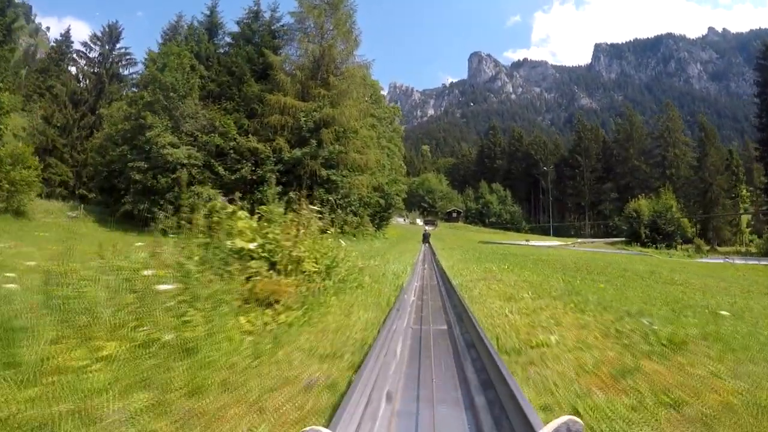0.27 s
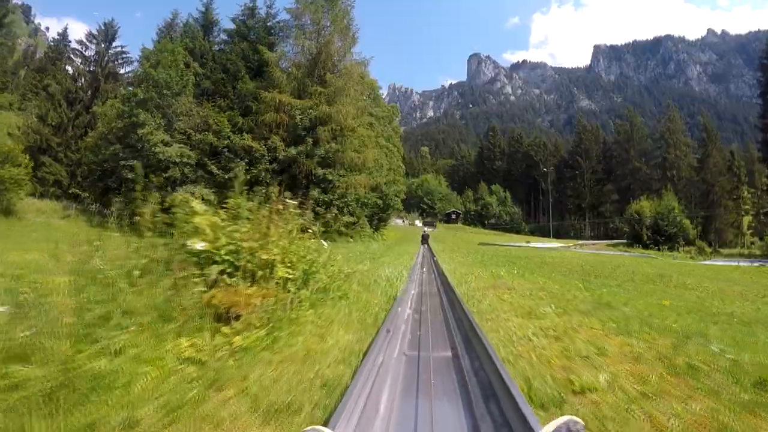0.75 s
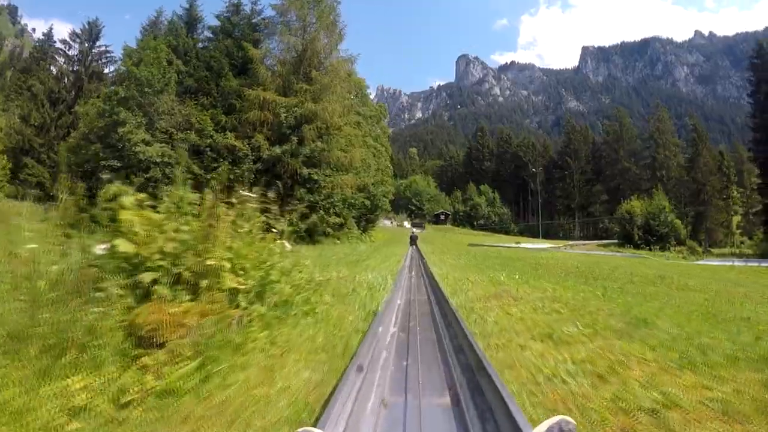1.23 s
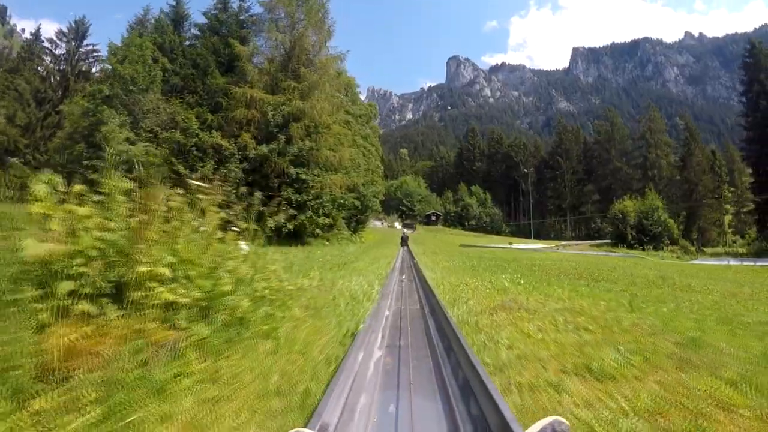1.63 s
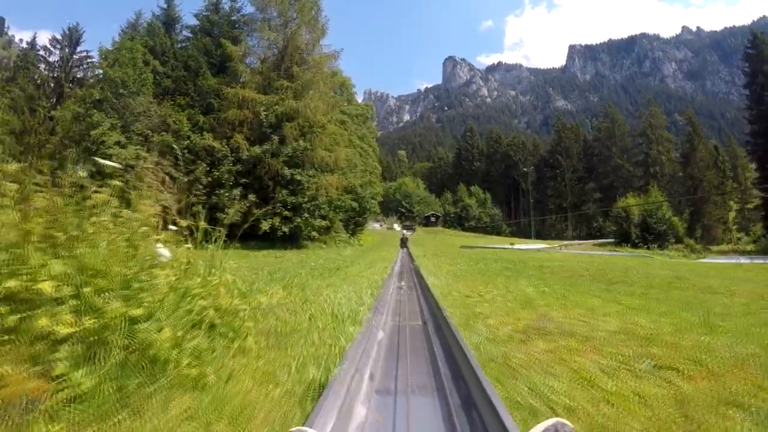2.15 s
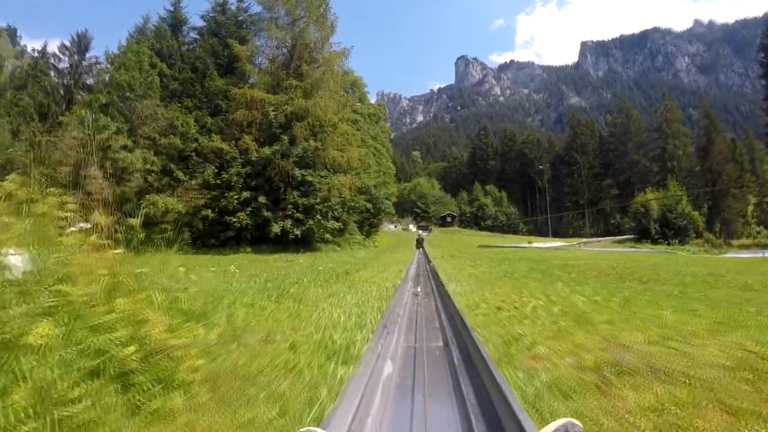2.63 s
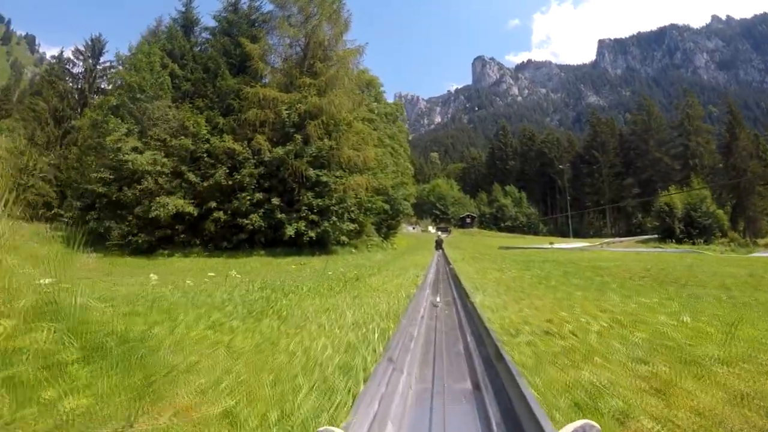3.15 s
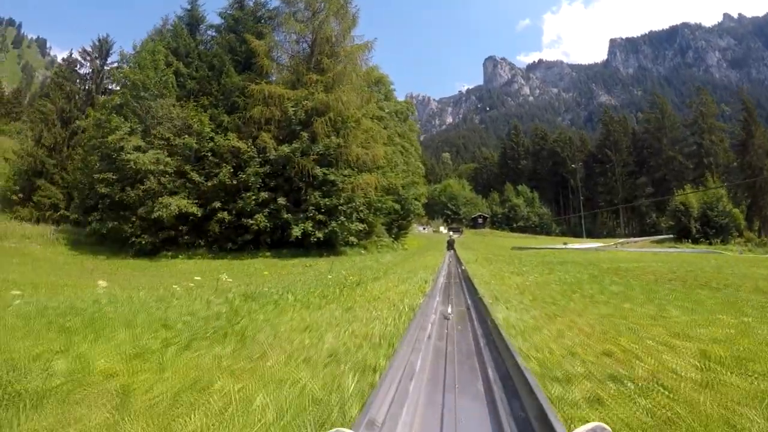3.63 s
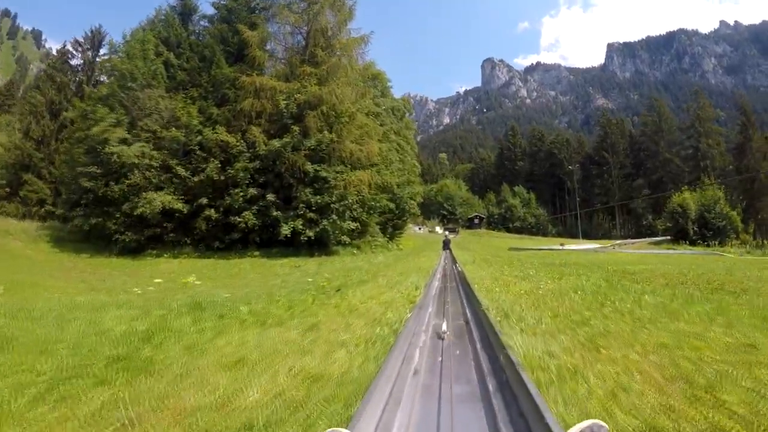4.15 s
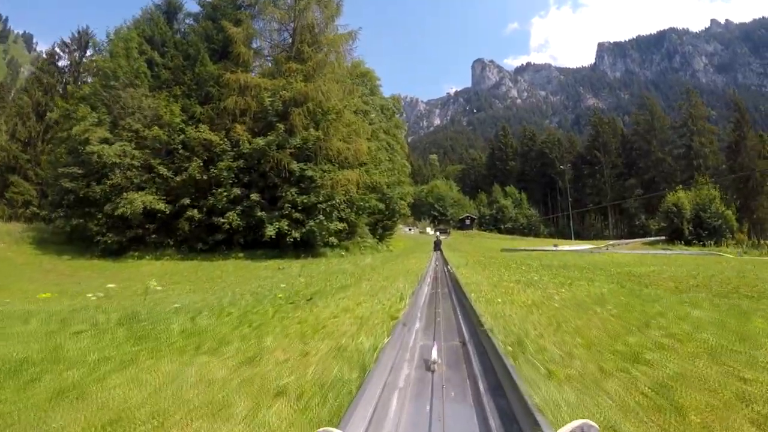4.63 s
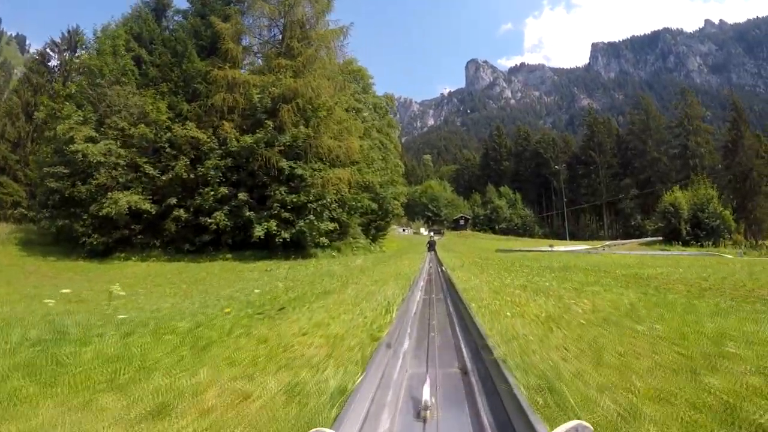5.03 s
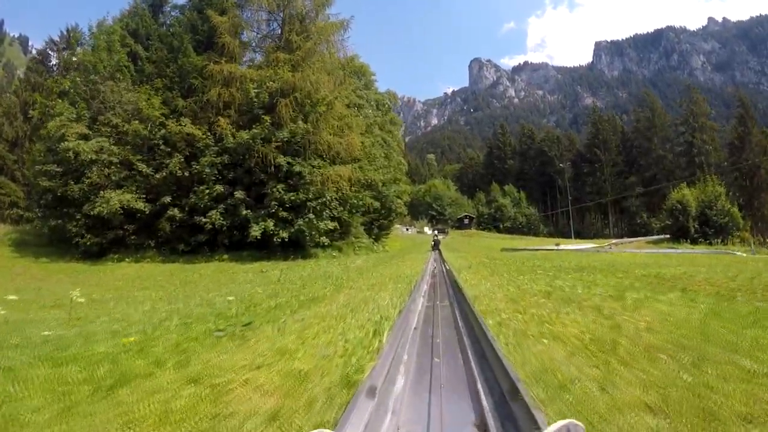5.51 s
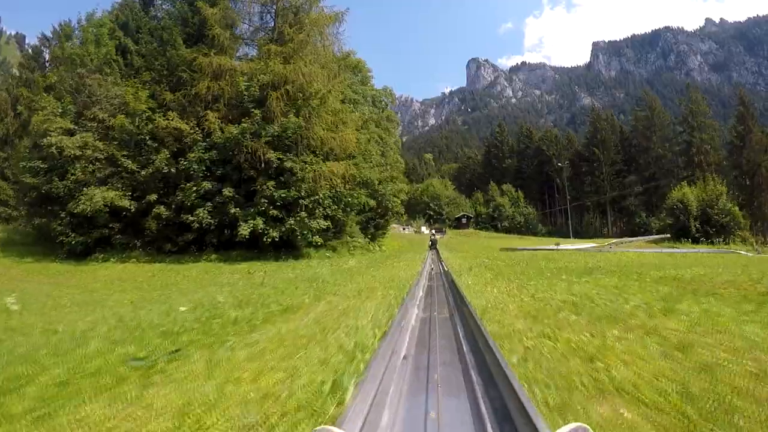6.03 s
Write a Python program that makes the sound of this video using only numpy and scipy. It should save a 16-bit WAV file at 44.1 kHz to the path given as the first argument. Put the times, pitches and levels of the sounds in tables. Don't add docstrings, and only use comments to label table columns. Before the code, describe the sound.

A continuous low rumble of wheels on gritty steel, with uneven drumming, midrange hum and thin hiss, close and outdoors. Joints clack, loose parts rattle and tick, and the sled body knocks hollowly. A high pulsing insect buzz comes and goes early; tiny grass seed flicks tick later. The mounted microphone starts mono and bassy, then spreads wide after the middle; one strong clank comes shortly before the ride cuts off still rolling.

```python
import sys
import numpy as np
from scipy import signal
from scipy.fft import rfft, irfft
from scipy.io import wavfile
from scipy.ndimage import uniform_filter1d

SR = 44100
rng = np.random.default_rng(int(sys.argv[2]) if len(sys.argv) > 2 else 0)


def ratio_of_db(decibels):
    return 10 ** (np.asarray(decibels, float) / 20)


def store_wav(level_fs):
    pcm = np.round(np.clip(np.atleast_2d(level_fs), -1, 1) * 32767)
    wavfile.write(sys.argv[1], SR, pcm.T.astype(np.int16))


N = 276507
T = np.arange(N) / SR

WIDE_FADE_S, WIDE_FADE_DB = (3.43, 3.534, 3.9), (-65, -12.5, 0)
# time in seconds, thud level in dB, length in ms.
THUDS = [(0.004, -20.5, 9), (0.147, -28.5, 6), (0.345, -28, 2.9), (0.675, -28, 2.2), (1.049, -21.5, 3.4),
         (1.968, -28.5, 8.3), (1.992, -27.5, 9.3), (2.101, -27.5, 2.8), (2.185, -26.5, 3.2),
         (2.208, -26.5, 4.5), (2.612, -24, 5.7), (2.667, -26.5, 6.4), (3.144, -30, 3.7), (3.172, -24, 3.3),
         (3.29, -27, 2.9), (4.515, -46, 3.2), (4.685, -30, 14), (4.709, -35, 4.1), (4.8, -32, 3.7),
         (4.916, -29.5, 3.7), (5.131, -30, 3.5), (5.148, -33, 8.3), (5.386, -40, 6.4), (5.62, -25, 3.1),
         (5.725, -30, 5.9), (5.931, -43, 1.4), (5.969, -46, 9.1), (5.997, -31, 1.9), (6.03, -33.5, 3.9),
         (6.208, -26.5, 5.4)]


def evened(x):
    return x / np.sqrt(np.mean(x ** 2) + 1e-20)


def read(points, hz):
    f, value = np.transpose(points)
    return np.interp(np.log(hz + 1), np.log(f + 1), value)


def split(hz, edges_hz):
    below = [1 / (1 + (hz / edge) ** 6) for edge in edges_hz]
    return np.diff([0 * hz, *below, 1 + 0 * hz], axis=0)


def wander(top_hz):
    lowpass = signal.butter(2, top_hz, fs=SR, output="sos")
    return evened(signal.sosfiltfilt(lowpass, rng.standard_normal(N)))


def wide_fade_db():
    return np.interp(T, WIDE_FADE_S, WIDE_FADE_DB)


def layers(noise_spectrum, colour, steady=0.7):
    # frequency in Hz, width in Hz, lift in dB.
    trough_modes = [(62.7, 13, -2), (201.2, 34, -5), (330.4, 64, 4), (2024, 370, -3), (3770, 320, -8.5),
                    (6600, 520, -17.5)]
    hz = np.fft.rfftfreq(N, 1 / SR)
    lift = 1 + sum(ratio_of_db(db) / (1 + (2 * (hz - f) / width_hz) ** 2) for f, width_hz, db in trough_modes)
    weights = split(hz, (100, 260, 1000))
    bands = irfft(noise_spectrum * ratio_of_db(read(colour, hz)) * lift * weights, N)
    swell = uniform_filter1d(uniform_filter1d(bands ** 2, 2600, axis=1), 2600, axis=1)
    return np.array([evened(b) for b in bands / (abs(swell) + 1e-12) ** (steady / 2)])


def bumps(rows, width_s):
    s, lift_db = np.transpose(rows)
    coarse_s = T[::64]
    lift = lift_db @ np.exp(-((coarse_s - s[:, None]) / width_s) ** 2)
    return np.interp(T, coarse_s, lift)


def levels(offset_db, follow, bumpy):
    # time in seconds, wheel load in dB, grit on the steel in dB.
    ride = [(0.03, -20, -37), (0.3, -25, -38.5), (0.62, -18, -32.5), (0.9, -23, -38.5), (1.1, -24.5, -38),
            (1.4, -20.5, -35), (1.77, -24.5, -38.5), (2.25, -19, -35.5), (2.6, -19, -37.5),
            (3.0, -21, -35.5), (3.43, -18.5, -37), (3.64, -22.5, -38), (3.82, -23, -34.5),
            (4.5, -23, -39.5), (4.76, -21, -37.5), (5.3, -23, -39), (5.78, -22.5, -40), (6.2, -21, -39.5)]
    # time in seconds, lift in dB.
    bounces = [(0.03, -1), (0.13, 10.5), (0.25, -1), (0.45, 1.5), (1.01, 5), (1.24, 6), (1.43, -12.5),
               (1.61, 4), (2.01, 6.5), (2.2, 0), (2.41, 4), (2.69, -8.5), (3.15, 2.5), (3.38, 2), (3.62, 5),
               (3.8, -6.5), (4.09, 3), (4.17, -7.5), (4.31, -5.5), (4.4, 3), (4.91, 4), (5.25, 4.5),
               (5.51, 7.5), (5.66, 4), (5.8, 7), (6.03, -0.5), (6.2, 5)]
    # time in seconds, lift in dB.
    drums = [(0.06, 3.5), (0.19, -6), (0.31, 5.5), (0.39, -5), (0.45, 4.5), (0.66, 0.5), (0.79, -9.5),
             (1.01, -3), (1.11, 8.5), (1.33, -1), (1.43, 3), (1.9, 4.5), (2.01, 11.5), (2.2, 4), (2.41, -7),
             (2.66, 6), (3.15, -3.5), (3.38, 2.5), (3.97, -5), (4.17, 4), (5.22, -4.5), (5.37, 3.5),
             (5.51, -6), (5.89, -16), (5.96, 2.5), (6.11, 2)]
    mean_load_db, mean_grit_db = -21, -38
    s, load_db, grit_db = np.transpose(ride)
    load = np.interp(T, s, load_db - mean_load_db)
    grit = np.interp(T, s, grit_db - mean_grit_db)
    boom = bumpy * bumps(bounces, width_s=0.065)
    drumming = bumpy * bumps(drums, width_s=0.038)
    base_db = np.reshape([mean_load_db, mean_load_db, mean_grit_db, mean_grit_db], (-1, 1)) + offset_db
    course_db = np.reshape(follow, (-1, 1)) * [load, load, grit, grit]
    return base_db + course_db + [boom, drumming, 0 * T, 0 * T]


def patchy(x, depth_db):
    z = signal.stft(x, nperseg=256)[2]
    patches = uniform_filter1d(rng.standard_normal(z.shape), 7, axis=0)
    patches = evened(uniform_filter1d(patches, 9, axis=1))
    return evened(signal.istft(z * ratio_of_db(depth_db * patches), nperseg=256)[1][:N])


def played(bands, levels_db, grit):
    flicker_db = np.outer([0, 1.1, 1.23, 1.4], grit)
    hiss = patchy(bands[-1], depth_db=1.7)
    return ([*bands[:-1], hiss] * ratio_of_db(levels_db + flicker_db)).sum(0)


def rolling():
    # frequency in Hz, density in dB per Hz.
    wind_colour = [(12, -33), (20, 10), (53, 5.5), (106, -8), (196, 3), (282, -15), (566, -16.5),
                   (632, -24), (747, -24), (987, -37), (1380, -41), (2480, -51.5), (3760, -52.5),
                   (10700, -65), (11300, -69.5), (15600, -75)]
    stereo_colour = [(12, -48), (20, 16), (50, 7.5), (112, -3), (191, 2), (274, -23), (465, -29.5),
                     (669, -26.5), (1100, -49), (1820, -46.5), (2280, -54.5), (9170, -62.5), (12500, -74.5),
                     (13500, -81), (15600, -93.5)]
    wide_colour = [(12, -13), (20, 21.5), (61, -12), (112, -9.5), (186, -11), (290, -28.5), (492, -15.5),
                   (582, -7.5), (747, -28), (883, -32), (1040, -51.5), (1870, -61), (2410, -71.5),
                   (9420, -72), (15600, -113)]
    # frequency in Hz, share 0-1.
    lean_share = [(40, 0.6), (90, 0), (200, 0.61), (600, .05), (2000, 0.4), (8000, 0.2)]
    wind_db, stereo_db = (2.5, -1, -1, -11.5), (-3.5, -4.5, -3, -17.5)
    wide_offset_db = (9.5, 8, 2.5, -6)
    follow, wide_follow = (0.81, 1.03, 1.54, 1.28), (0.6, 0.83, 0.6, 0.6)

    first, second, third = rfft(rng.standard_normal((3, N)))
    lean = np.clip(read(lean_share, np.fft.rfftfreq(N, 1 / SR)), 0, 0.99)
    turn = np.interp(T, (3.54, 4.69), [0, np.pi / 2])
    grit = evened(wander(23.5) + 1.1 * wander(92))
    centre = np.cos(turn) * layers(first, wind_colour) + np.sin(turn) * layers(second, stereo_colour)
    wide = layers(np.sqrt(1 - lean ** 2) * third - lean * second, wide_colour, steady=0.18)
    mode_db = np.outer(wind_db, np.cos(turn) ** 2) + np.outer(stereo_db, np.sin(turn) ** 2)
    wide_db = np.reshape(wide_offset_db, (-1, 1)) + wide_fade_db()
    centre = played(centre, levels(mode_db, follow, bumpy=1), grit)
    wide = played(wide, levels(wide_db, wide_follow, bumpy=0.31), grit)
    return np.array([centre, wide * (T > WIDE_FADE_S[0])])


def hits():
    # time in seconds, clack level in dB, thud over clack in dB, rattle length in ms.
    clacks = [(0.04, -28.5, 13.5, 6.5), (0.325, -45, -4, 3.8), (0.411, -33.5, -3, 6.5),
              (0.441, -26.5, 10, 4.25), (0.466, -35.5, 6, 4.8), (0.545, -36, 6, 8),
              (0.597, -24.5, 8.5, 4.9), (0.62, -36, -4, 4.8), (0.656, -25.5, 7, 6), (1.015, -39.5, 1, 2.3),
              (1.149, -29.5, 6, 2.1), (1.245, -33, 12, 4), (1.295, -32, 13.5, 4.6), (1.357, -31, 11.5, 5),
              (1.427, -24, 12.5, 5.5), (1.447, -32.5, 1, 5), (1.475, -37, 8, 5.3), (1.552, -30.5, 9.5, 5.7),
              (1.638, -33.5, -24, 2.8), (1.715, -35, -1, 3.9), (1.758, -33, 11.5, 4.9),
              (1.89, -46.5, 21, 8.3), (2.178, -32.5, -5, 4.8), (2.525, -26.5, 2, 1.3), (2.631, -36, 6, 5.1),
              (2.821, -38, 3, 2.7), (2.835, -33, 8.5, 4.4), (2.916, -40, -2, 4.1), (3.064, -30, -1, 1.96),
              (3.113, -44, -5, 3.9), (3.244, -38.5, -11, 2.4), (3.354, -41, 11, 11),
              (3.385, -35, 10.5, 4.9), (3.48, -38, 11, 6.5), (3.565, -40, 14, 3.9)]
    late_clacks = [(3.713, -44, -11, 2), (3.738, -37, 1, 1.6), (3.752, -35.5, 6, 2), (3.78, -41.5, 4, 3),
                   (3.889, -36.5, 10.5, 3.5), (3.947, -46.5, 15.5, 6.6), (4.03, -36, 10, 2.3),
                   (4.086, -35.5, 6.5, 4.1), (4.099, -29.5, 4.5, 2.9), (4.12, -40.5, 8, 1.3),
                   (4.161, -43, 12.5, 2.1), (4.21, -34, 8, 2.2), (4.247, -34, 9.5, 1.9),
                   (4.295, -43.5, 15, 3.2), (4.413, -50.5, 12, 6.3), (4.438, -33.5, 2, 1.4),
                   (4.496, -46.5, 14, 5.3), (4.581, -48.5, 13, 4), (4.662, -34, 1, 1.87),
                   (4.737, -36.5, 3, 2.3), (5.176, -45.5, 3, 5.4), (5.498, -37.5, 8.5, 4.1),
                   (5.523, -55, 12, 1.9), (5.564, -32, 9, 1.62), (5.695, -48.5, 13, 5.4),
                   (5.787, -30.5, 12.5, 2.6), (5.798, -37.5, -12, 2.3), (5.806, -32, 3, 3.2),
                   (5.817, -37.5, 5, 4.7), (6.147, -45, 11, 1.3), (6.168, -43.5, 10.5, 2.5)]
    # time in seconds, tick level in dB, length in ms.
    ticks = [(0.055, -36.5, 7.4), (0.469, -41.5, 2.6), (0.554, -47.5, 3.5), (0.61, -39, 3.8),
             (0.678, -40.5, 3.4), (1.114, -52.5, 16), (1.418, -46, 6.5), (1.448, -33.5, 3.4),
             (2.186, -41, 2.7), (2.397, -49, 3), (2.548, -49, 5.8), (2.513, -40, 4.7), (2.587, -43, 4.5),
             (2.705, -47, 4), (2.763, -52, 2.3), (2.791, -60, 1.3), (2.87, -50, 12), (2.994, -49, 2.7),
             (3.463, -46, 4), (3.81, -49.5, 6.3), (3.98, -45.5, 2.4), (4.314, -48, 3.8),
             (4.331, -57.5, 3.4), (4.405, -55.5, 2.9), (4.458, -56.5, 1.7), (4.516, -53, 1.8),
             (4.597, -57, 4), (4.705, -50.5, 3), (5.025, -87, 5.5), (5.422, -49.5, 1.7), (5.799, -36, 3.6),
             (5.823, -56, 3.8), (5.88, -62, 3.6), (5.999, -63, 4.2), (6.112, -59, 5.5)]
    rows = [(s, db + thud, db, db - 10, ms) for s, db, thud, ms in clacks]
    rows += [(s, db + thud, db, db - 13, ms) for s, db, thud, ms in late_clacks]
    rows += [(s, db, db - 18, db - 27, ms) for s, db, ms in THUDS]
    rows += [(s, db + 8, db + 3, db, ms) for s, db, ms in ticks]
    return np.transpose(rows)


def blows(length_ms, stretch, lumpy_db, strike_db):
    t = np.arange(4096) / SR
    draw = rng.standard_normal((len(length_ms), 2, len(t)))
    decay_s = stretch * np.maximum(length_ms[:, None] - 1.2, 0.25) / 1000
    u = t / decay_s
    lumps = ratio_of_db(lumpy_db * evened(uniform_filter1d(draw[:, 1], 60, axis=1)))
    swell = (1 - np.exp(-(u / 0.5) ** 1.17)) * np.exp(-u)
    tail = ratio_of_db(-17.5) * u ** 2 * np.exp(-u / 1.18)
    rattle = draw[:, 0] * lumps * (swell + tail)
    strike = (np.arange(len(t)) == 20) * np.linalg.norm(rattle, axis=1)[:, None]
    return rattle + ratio_of_db(strike_db) * strike


def ring(force, times, modes, levels_db):
    hz = np.fft.rfftfreq(force.shape[1], 1 / SR)
    detune = 1 + 0.025 * rng.standard_normal((len(force), len(modes)))
    share = ratio_of_db(2.5 * rng.standard_normal((len(force), len(modes))))
    body = 0
    for i, (mode_hz, width_hz, db) in enumerate(modes):
        f = mode_hz * detune[:, i, None]
        response = width_hz / (width_hz + 1j * (hz ** 2 - f ** 2) / (hz + 30))
        body = body + share[:, i, None] * ratio_of_db(db) * response
    top_hz = np.clip(6996.5 + 150 * (levels_db[1] + 44.5), 5000, 12000)[:, None]
    bands = split(hz, (230, 900, 3000))[1:, None]
    parts = irfft(rfft(force) * body / (1 + (hz / top_hz) ** 4) * bands)
    parts = np.roll(parts, 256, axis=2) * signal.windows.tukey(parts.shape[2], 0.1)
    peak = np.sqrt(uniform_filter1d(parts ** 2, 88, axis=2).max(2))
    sounds = (parts * (ratio_of_db(levels_db) / peak)[:, :, None]).sum(0)
    out = np.zeros(N + 2 * force.shape[1])
    for s, sound in zip(times, sounds):
        out[round(s * SR):][:len(sound)] += sound
    return out[256 + 44:][:N]


def knocks():
    # frequency in Hz, width in Hz, level in dB.
    sled_modes = [(342, 250, 16.5), (750, 112, 8), (1524, 840, 8.5), (1980, 91, 12), (2710, 29, 6),
                  (3630, 1150, 8), (4720, 260, 8), (6000, 600, -49.5), (8300, 800, -31)]
    late_modes = [(413, 550, 4.5), (656, 66, 4), (1413, 155, 12.5), (1800, 490, 6.5), (2700, 240, 1.5),
                  (3900, 1640, 7), (4780, 500, -1), (5700, 490, 8), (8300, 1200, -30)]
    wide_modes = [(422, 200, 14.5), (549, 33, -6), (840, 54, 1), (1280, 290, -13), (2000, 300, -30),
                  (2900, 500, -46), (6000, 1500, -31), (9000, 1500, -46)]
    hollow_modes = [(675, 35, 6), (433, 170, -25), (1470, 100, -2.5), (1790, 180, -3), (4000, 2900, -18)]
    hollow_db = (-2, -0.5, -3)

    every = hits()
    late = every[0] > 3.6
    s, thud, clack, tick, length_ms = every[:, ~late]
    centre = ring(blows(length_ms, 1.75, 1.4, -14), s, sled_modes, [thud, clack, tick])

    s, thud, clack, tick, length_ms = every[:, late]
    force = blows(length_ms, 1.94, 2.8, -9.5)
    hollow = np.isin(s, np.transpose(THUDS)[0])
    big = (s > 5.77) & (s < 5.81)
    parts_db = np.array([thud, clack, tick]) + np.outer(hollow_db, hollow)
    for modes, some in [(late_modes, ~hollow & ~big), (sled_modes, big)]:
        centre += ring(force[some], s[some], modes, parts_db[:, some])
    hollow_force = blows(0.62 * length_ms[hollow], 1.8, 1.5, -23)
    centre += ring(hollow_force, s[hollow], hollow_modes, parts_db[:, hollow])
    wide = ring(force, s, wide_modes, [thud + 16 - 2.9 * hollow, clack + 1.1, tick - 2.5])
    return np.array([centre, -wide * ratio_of_db(wide_fade_db())])


def damped_tones(rows, lift_db, rise_ms, wide_db):
    t, out = np.arange(4096) / SR, np.zeros(N + 4096)
    rise = 1 - np.exp(-(1000 * t / rise_ms) ** 2)
    for s, peak_db, hz, t60_ms in rows:
        decay_db = 60 * 1000 * t / max(t60_ms, 8)
        tone = rise * ratio_of_db(peak_db + lift_db - decay_db) * np.sin(2 * np.pi * hz * t)
        out[round(s * SR) - 44:][:len(t)] += tone
    centre = out[:N]
    return np.array([centre, -centre * ratio_of_db(wide_db) * (T > WIDE_FADE_S[-1])])


def body_notes():
    # time in seconds, peak in dB, pitch in Hz, ring t60 in ms.
    note_rows = [(0.039, -17, 374, 60), (0.144, -13.5, 468, 64), (0.439, -17, 388, 52),
                 (0.596, -19, 395, 51), (0.656, -14, 375, 68), (1.052, -22, 377, 60),
                 (1.147, -13.5, 420, 56), (1.245, -22, 770, 60), (1.294, -19, 390, 69),
                 (1.356, -14, 382, 65), (1.426, -11, 380, 48), (1.552, -24, 382, 60), (1.758, -16, 532, 48),
                 (2.184, -18, 391, 74), (2.614, -26, 396, 79), (2.833, -18, 708, 47), (3.885, -21, 423, 80),
                 (4.1, -19, 700, 60), (4.295, -26, 686, 72), (4.687, -30, 681, 60), (4.708, -31, 657, 79),
                 (4.915, -26, 685, 41), (5.13, -30, 716, 67), (5.624, -18, 680, 85), (5.693, -29, 700, 60),
                 (5.724, -33, 692, 52), (5.787, -13.5, 460, 70), (5.933, -32, 673, 67),
                 (5.968, -27, 703, 67), (5.999, -29, 678, 60), (6.033, -29, 668, 60), (6.21, -33, 690, 60)]
    return damped_tones(note_rows, lift_db=-3, rise_ms=2.3, wide_db=-4)


def steel_pings():
    # time in seconds, peak in dB, pitch in Hz, ring t60 in ms.
    ping_rows = [(0.0404, -21, 2000, 91), (0.4155, -33, 1330, 50), (0.4409, -10.5, 2090, 36),
                 (0.599, -25, 2000, 40), (0.6589, -14, 2050, 49), (1.052, -31, 2030, 46),
                 (1.1478, -20, 2230, 25), (1.2461, -23, 1850, 63), (1.296, -20, 2130, 35),
                 (1.3583, -19, 2050, 46), (1.4277, -15, 2145, 40), (1.5539, -20, 2120, 45),
                 (1.6392, -18, 2220, 30), (1.714, -25, 1540, 40), (1.7592, -18, 1300, 27),
                 (2.1867, -26, 1340, 32), (2.5227, -17, 2140, 21), (2.837, -20, 1410, 32),
                 (3.062, -29, 1190, 53), (3.3553, -24, 1470, 40), (3.8838, -24, 1290, 40),
                 (4.03, -28, 1360, 33), (4.0881, -42, 1280, 34), (4.1, -27, 1460, 34),
                 (4.1184, -30, 1450, 45), (4.1599, -34, 1490, 40), (4.2083, -22, 1320, 40),
                 (4.2466, -18, 1410, 20), (4.4383, -30.5, 1470, 33), (4.4957, -36, 1460, 40),
                 (4.6618, -29, 1490, 40), (4.732, -21, 1370, 37), (4.7374, -29, 1490, 30),
                 (4.918, -27.5, 1820, 31), (5.1315, -29, 1455, 43), (5.4212, -30, 1890, 28),
                 (5.4969, -64, 1310, 40), (5.5654, -21, 1450, 24), (5.7872, -9.5, 1870, 28),
                 (5.8, -21, 1290, 40), (6.1459, -36, 1800, 58), (6.167, -23, 1460, 25),
                 (6.2198, -31, 1510, 34)]
    return damped_tones(ping_rows, lift_db=-6, rise_ms=0.67, wide_db=-8)


def resonate(x, hz, width_hz):
    turn = np.exp(2j * np.pi * np.cumsum(hz) / SR)
    r = np.exp(-np.pi * width_hz / SR)
    return 2 * (turn * signal.lfilter([1 - r], [1, -r], x / turn)).real


def resonate_twice(x, hz, second_hz, width_hz):
    return resonate(resonate(x, hz, width_hz), second_hz, width_hz)


def grasshopper():
    # time in seconds, leg strokes so far.
    stroke_rows = [(.213, -3), (.266, 0), (.589, 18), (.714, 25), (.9, 35), (1.051, 43), (1.213, 51),
                   (1.223, 51.5)]
    # time in seconds, level in dB, wing resonance in Hz.
    buzz_rows = [(.2, -72, 7900), (.3, -63, 7950), (.55, -55, 8050), (.8, -53, 8100), (1.0, -53, 8130),
                 (1.15, -50, 8250), (1.22, -50, 8350)]
    strokes = np.interp(T, *np.transpose(stroke_rows))
    s, level_db, hz = np.transpose(buzz_rows)
    swing = 0.5 + 0.5 * np.cos(2 * np.pi * strokes)
    pegs = np.cumsum(720 * (1 + 0.091 * wander(40))) / SR
    clicks = evened(np.diff(np.floor(pegs), prepend=0) * ratio_of_db(2.5 * rng.standard_normal(N)))
    drive = (clicks + 0.45 * rng.standard_normal(N)) * ratio_of_db(1.9 * wander(30))
    wing_hz, high_hz = np.interp(T, s, hz), 12400 + 0 * T
    passing = ratio_of_db(np.interp(T, [0.6, 1.05], [-9, -3]))
    sound = resonate_twice(drive * (swing ** 2.3 + 0.34), wing_hz, wing_hz, 600)
    sound -= passing * resonate_twice(drive * swing ** 3, wing_hz * 1.225, wing_hz * 1.215, 1200)
    sound += passing * resonate_twice(drive * swing ** 3, wing_hz, wing_hz, 1800)
    sound += ratio_of_db(-19) * resonate_twice(drive * swing ** 4, high_hz, high_hz, 2500)
    sound = sound / np.std(sound[SR // 2:SR])
    on = (T > stroke_rows[0][0]) & (T < stroke_rows[-1][0])
    return sound * on * ratio_of_db(np.interp(T, s, level_db))


def metal_chinks():
    # time in seconds, peak in dB, pitch in Hz, ring t60 in ms.
    chink_rows = [(1.1473, -23, 3720, 21), (1.3587, -22, 3360, 25), (1.4272, -25, 4890, 25),
                  (1.6387, -30, 4150, 27), (1.7146, -22.5, 3780, 23), (2.1859, -18.5, 3770, 21),
                  (2.524, -26, 4490, 28), (3.0634, -20, 3520, 23), (4.0284, -46, 3080, 25),
                  (4.245, -35, 3000, 25), (4.4378, -41, 3050, 25), (5.564, -28, 3200, 20),
                  (5.7867, -34, 3740, 25), (5.799, -19, 3130, 22), (6.1115, -38, 6360, 33),
                  (6.1454, -41, 3830, 25)]
    return damped_tones(chink_rows, lift_db=-7, rise_ms=0.73, wide_db=-12)


def seed_flicks():
    # time in seconds, peak in dB, pitch in Hz, ring t60 in ms.
    flick_rows = [
        (2.748, -42, 11500, 8),
        (2.788, -32, 10200, 8.7),
        (3.815, -50, 13500, 14),
        (3.984, -46, 10000, 8),
        (4.06, -48, 12500, 8),
        (6.118, -48, 12000, 10),
    ]
    return damped_tones(flick_rows, lift_db=-7, rise_ms=0.73, wide_db=-12)


def scene():
    centre, wide = (rolling() + knocks() + body_notes() + steel_pings()
                    + metal_chinks() + seed_flicks())
    centre = centre + grasshopper()
    return np.array([centre + wide, centre - wide])


def low_pass(x):
    return signal.sosfilt(signal.butter(12, 15400, fs=SR, output="sos"), x)


def record(dry):
    # time in seconds, top edge in Hz.
    top_edge = [(4.1, 15400), (4.14, 11200), (4.3, 14200), (4.45, 12800), (4.62, 15000), (4.7, 12200),
                (4.9, 14000), (5.06, 13600), (5.15, 11400), (5.45, 12600), (5.65, 14800), (5.76, 12900),
                (5.82, 11200), (5.92, 11200), (5.98, 13000)]
    ceiling = 0.93
    held = dry / (1 + (abs(dry) / ceiling) ** 4) ** (1 / 4)
    hz, t, z = signal.stft(held, SR, nperseg=1024)
    below_edge = hz[:, None] < np.interp(t, *np.transpose(top_edge))
    kept = signal.istft(z * below_edge, SR, nperseg=1024)[1][:, :N]
    return low_pass(kept)


dry = scene()
out = record(dry)
store_wav(out)
```